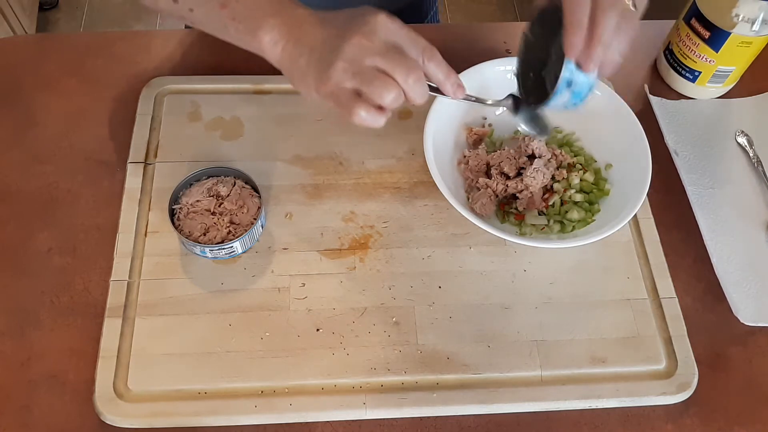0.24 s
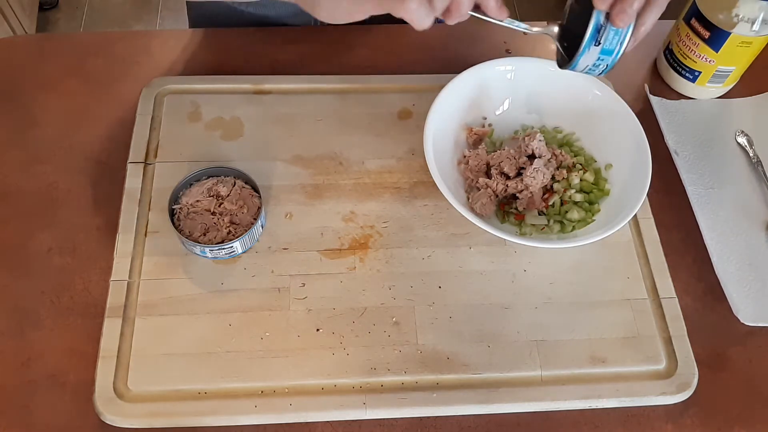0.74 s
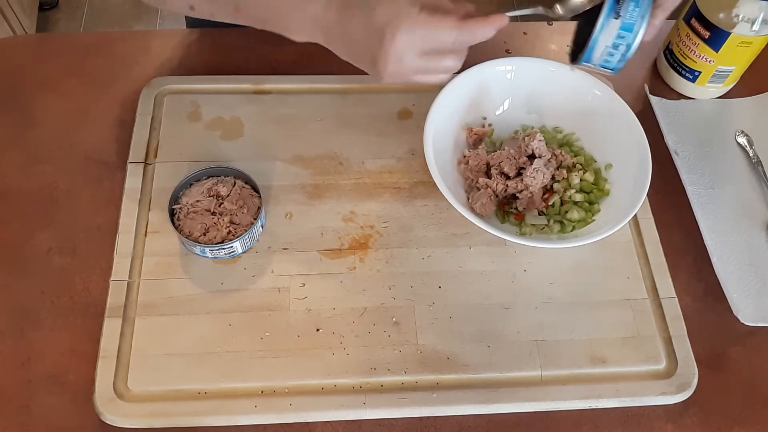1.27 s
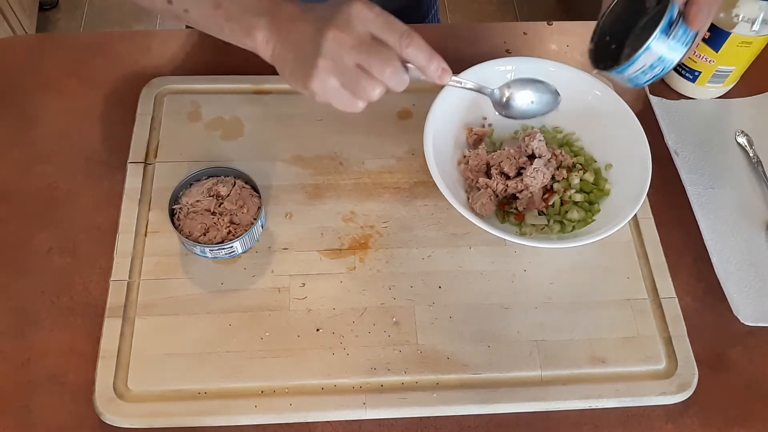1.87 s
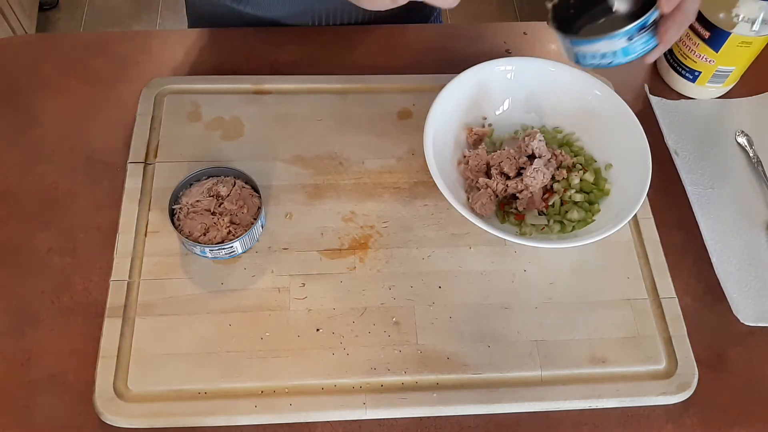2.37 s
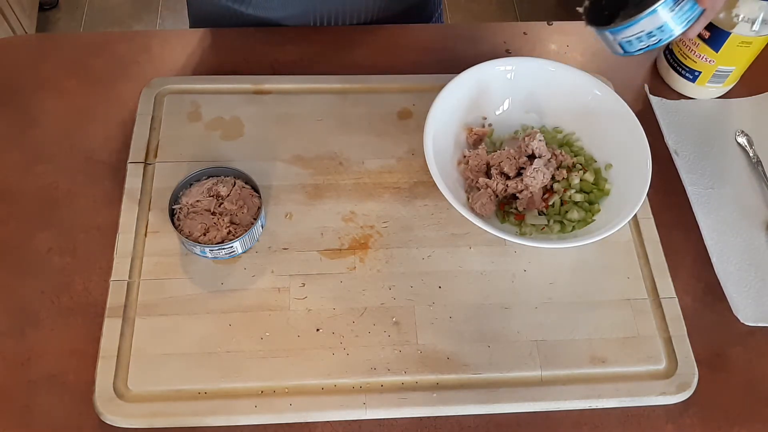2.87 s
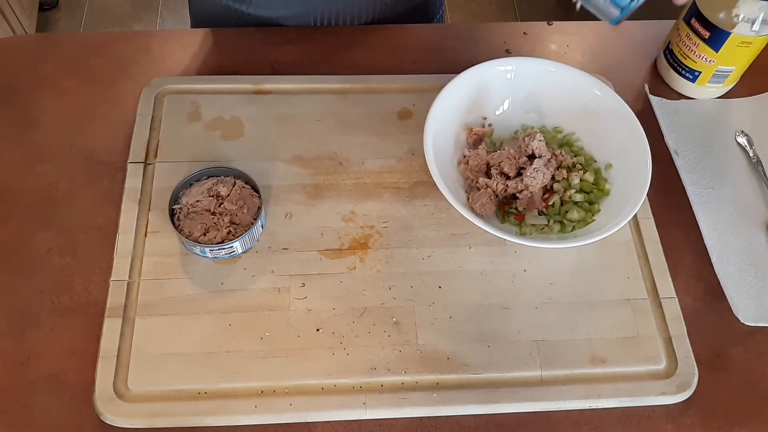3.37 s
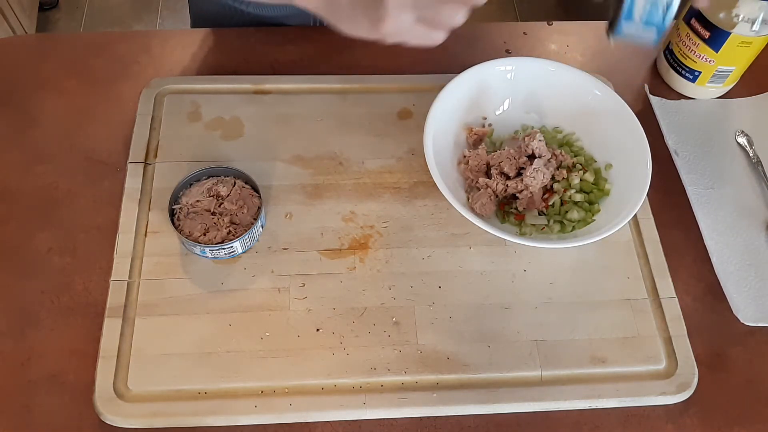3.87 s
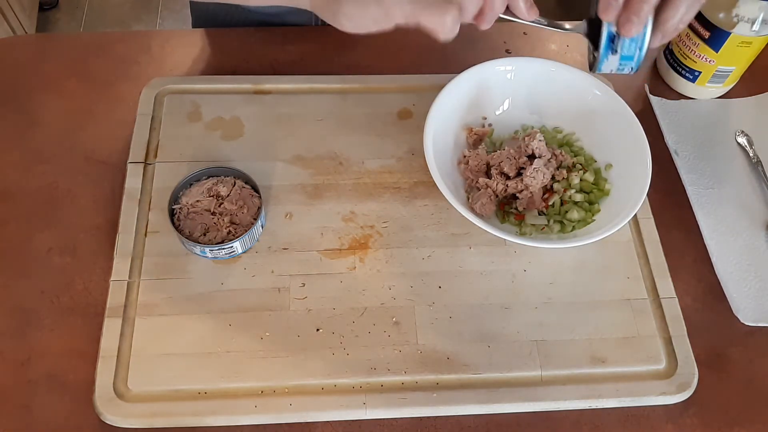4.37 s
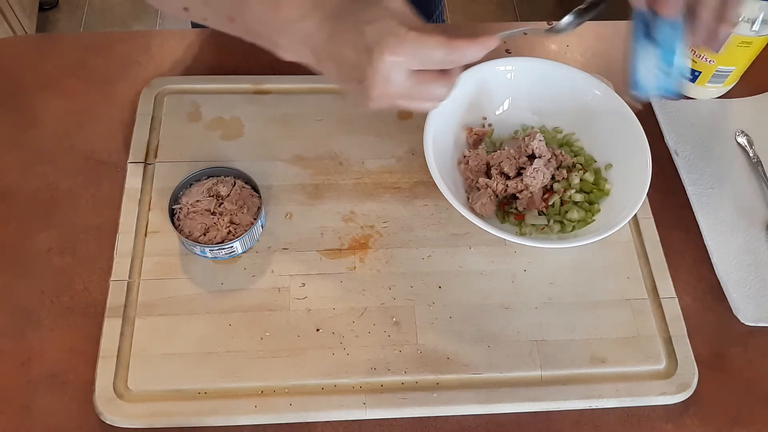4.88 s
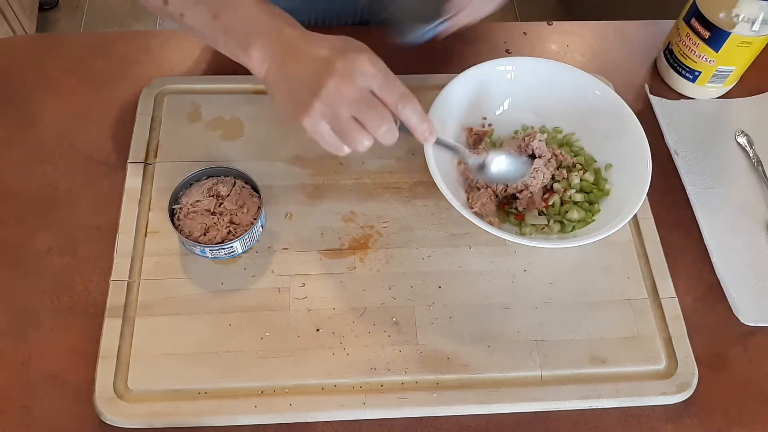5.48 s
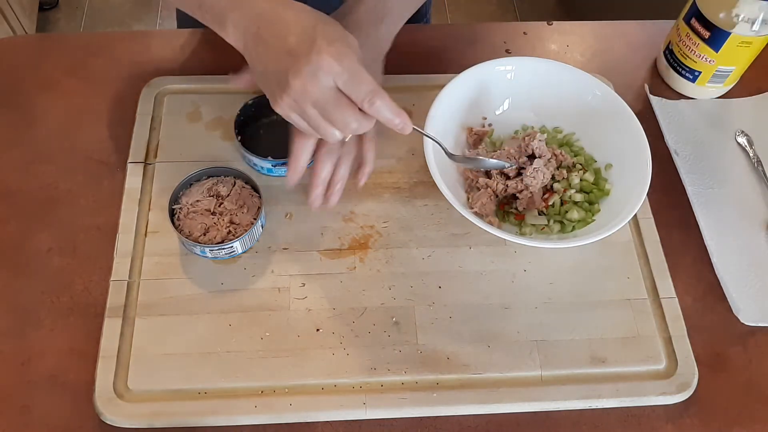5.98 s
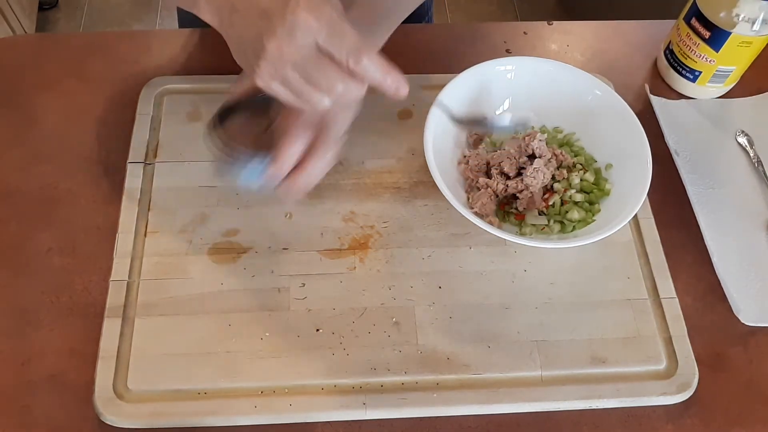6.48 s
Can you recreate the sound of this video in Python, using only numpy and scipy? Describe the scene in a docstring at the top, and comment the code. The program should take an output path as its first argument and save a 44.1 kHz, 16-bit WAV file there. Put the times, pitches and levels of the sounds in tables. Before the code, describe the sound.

A metal spoon scrapes out a thin steel can in short runs, with bright ticks on the rim, brief rasps along the wall and small ringing knocks, separated by pauses. Near the end the empty can is put down on a wooden board with a quick, hollow clatter, followed by a very soft thud. The sounds are close, in a small, slightly reverberant kitchen where an appliance hums faintly.

```python
"""A metal spoon scrapes the last tuna out of a thin steel can held over a bowl in a small kitchen.
Stick-slip friction makes the wall rasp; knocks on the can and ticks on its rim excite damped modes.
The empty can is then put down on a wooden board and knocked against a second can. Moist food and
fingers add soft thuds, the room reverberates, and an appliance hums in the background."""
import sys
import numpy as np
from scipy import signal
from scipy.fft import rfft, irfft, next_fast_len
from scipy.io import wavfile

SR = 44100
rng = np.random.default_rng(int(sys.argv[2]) if len(sys.argv) > 2 else 0)


def store_wav(level_fs):
    """Save 16-bit WAV to argv[1]."""
    pcm = np.round(np.clip(np.atleast_2d(level_fs), -1, 1) * 32767)
    wavfile.write(sys.argv[1], SR, pcm.T.astype(np.int16))


N = 296793
SPAN = 32768   # samples in one event
AGE = np.arange(SPAN) / SR   # seconds since its onset
HZ = np.fft.rfftfreq(SPAN, 1 / SR) + 1


def from_db(db):
    """Amplitude ratio of a level in decibels."""
    return 10 ** (np.asarray(db) / 20)


def unit(x):
    """Normalisation to unit energy."""
    return x / np.sqrt(np.sum(x ** 2) + 1e-20)


def at_hz(points, hz):
    """Interpolation on a log-frequency axis."""
    frequencies, values = np.transpose(points)
    return np.interp(np.log(hz), np.log(frequencies), values)


def fade(t60):
    """Exponential decay, 60 dB in t60 seconds."""
    return from_db(-60 * AGE / max(t60, 1e-3))


def band(x, low, high):
    """Causal Butterworth band-pass."""
    return signal.sosfilt(signal.butter(3, [low, min(high, .45 * SR)], "band", fs=SR, output="sos"), x)


def add(out, start_s, sound):
    """Superposition: mix in an event, its end faded; one begun before time zero leaves only its tail."""
    start = round(start_s * SR)
    ending = np.clip(4 - 5 * AGE / AGE[-1], 0, 1)
    out[:, max(start, 0):start + SPAN] += (sound * ending)[..., max(-start, 0):N - start]


# Motor tones: pitch_hz, level_db
MOTOR_TONES = [(59.3, -82.5), (109.5, -73), (114.5, -87.5), (172, -83), (232, -89), (258, -79), (367, -89),
               (441, -87)]
# Spectrum of the room air: frequency_hz, relative_density_db
AIR_SPECTRUM = [(15, -35), (25, -28), (38, -20), (50, -9.5), (80, -16), (102, -6.5), (206, -17),
                (256, -1.5), (285, -15), (405, -19), (439, -14.5), (560, -20.5), (734, -24.5),
                (1230, -31.5), (7310, -35.5), (16000, -33)]
def appliance_and_air(waver=.25, air_db=-69):
    """Random amplitude and phase modulation makes motor tones waver over faint broadband noise."""
    t = np.arange(N) / SR
    knots = np.arange(0, t[-1] + 1, 1 / 10)
    hum = 0
    for hz, db in MOTOR_TONES:
        swell, drift = (np.interp(t, knots, rng.standard_normal(len(knots))) for _ in range(2))
        phase = 2 * np.pi * hz * t + 2 * waver * drift
        hum += np.sqrt(2) * from_db(db) * (1 + waver * swell) * np.sin(phase)
    size = next_fast_len(N)
    hz = np.fft.rfftfreq(size, 1 / SR) + 1
    mid, side = rfft(rng.standard_normal((2, size))) * from_db(at_hz(AIR_SPECTRUM, hz))
    width = at_hz([(300, 0.44), (2000, 0.97)], hz)   # the ears are more alike in the bass
    air = irfft(np.array([mid + width * side, mid - width * side]), size)[:, :N]
    return (hum + from_db(air_db) * unit(air) * np.sqrt(2 * N)) * from_db([[1.1], [-1.1]])


# Reverberation time of the kitchen: frequency_hz, t60_s
ROOM_DECAY = [(200, 0.59), (600, 0.33), (1500, 0.41), (4000, 0.35), (8000, 0.37), (15000, 0.32)]
def kitchen(gap_s=0.0013, early_db=1, early_t60=0.085):
    """Reverberation, as a frequency response: early reflections off board and bowl, then a diffuse tail."""
    edges = np.geomspace(100, 19000, 8)
    tail = 0
    for low, high in zip(edges, edges[1:]):
        mid, side = rng.standard_normal((2, SPAN))
        apart = min(high / 1800, 1)   # long waves reach both ears alike
        ears = np.array([mid + apart * side, mid - apart * side]) / np.hypot(1, apart)
        tail += band(ears, low, high) * fade(at_hz(ROOM_DECAY, np.sqrt(low * high)))
    tail = unit(tail * np.clip(AGE / gap_s - .5, 0, 1)) * np.sqrt(2)
    return rfft(tail * (1 + from_db(early_db) * fade(early_t60)))


# Touches of moist food and fingers: start_s, length_s, level_db, centre_hz
SOFT_TOUCHES = [(5.149, 0.0049, -71, 5980), (5.217, 0.095, -77, 905), (5.274, 0.0054, -70, 7120),
                (6.235, 0.044, -68, 296), (6.244, 0.029, -74, 1092)]
def thuds():
    """Heavy damping: soft contacts give puffs of band-limited noise with no ring."""
    out = np.zeros((2, N))
    for start_s, length_s, level_db, hz in SOFT_TOUCHES:
        swell = 2 * AGE / length_s * np.exp(1 - 2 * AGE / length_s)
        puff = unit(band(rng.standard_normal(SPAN), hz * .65, hz * 1.42)) * np.sqrt(SPAN) * swell
        add(out, start_s, from_db(level_db) * irfft(rfft(puff) * (1 + .5 * kitchen())))
    return out


def resonance(hz, width_hz):
    """Frequency response of a damped oscillator, with a peak of one."""
    return 1 / (1 + 1j * (HZ ** 2 - hz ** 2) / (HZ * max(width_hz, 4)))


def body(modes, clank_db, clank_t60, crowded_hz, spread_db, damping):
    """Modal superposition: distinct low modes ring while crowded upper modes merge into a short clank."""
    ring = 0
    for k, (hz, width_hz, db) in enumerate(modes):
        strength, detune = rng.standard_normal(2)
        mode = resonance(hz * (1 + 0.0018 * detune), width_hz * damping)
        ring += (-1) ** k * from_db(db + spread_db * strength) * mode
    high_pass = (1j * HZ / (crowded_hz + 1j * HZ)) ** 2
    clank = rfft(unit(rng.standard_normal(SPAN) * fade(clank_t60)))
    return rfft(unit(irfft(ring))) + from_db(clank_db) * high_pass * clank


def spot(hz, width_hz, level_db):
    """Local resonance of the metal at the point of contact, delayed by a quarter period."""
    delay = np.exp(-2j * np.pi * HZ / (4 * hz))
    return from_db(level_db) * rfft(unit(irfft(resonance(hz, width_hz)))) * delay


def blow(chatter_s, chatter_db):
    """Force spectrum of an impact: one impulse, then decaying chatter between the surfaces."""
    chatter = rng.standard_normal(SPAN) ** 3 * np.exp(-AGE / chatter_s)
    force = from_db(chatter_db) * unit(chatter)
    force[0] += 1
    return rfft(force)


def minimum_phase(db):
    """Causality: folding the cepstrum gives a filter with this dB curve and no pre-echo."""
    cepstrum = irfft(np.log(from_db(db)))
    cepstrum[1:SPAN // 2] *= 2
    cepstrum[SPAN // 2 + 1:] = 0
    return np.exp(rfft(cepstrum))


# Bounds of a contact's five registers: edge_hz
REGISTER_EDGES = [250, 1000, 2200, 4400, 8000, 16000]
def voicing(level_db, tilt_db, spots_hz, lift_db, colour=None, reach_octaves=0.74):
    """Spectral envelope in dB per register: hard contacts tilt it up, and spots lift nearby pitches."""
    edges = np.array(REGISTER_EDGES)
    centres = np.sqrt(edges[:-1] * edges[1:])
    octaves = np.log2(edges[1:] / 4000)
    near = sum(np.exp(-(np.log2(centres / hz) / reach_octaves) ** 2) for hz in spots_hz)
    colour_db = 0 if colour is None else at_hz(colour, centres)
    return level_db + tilt_db * octaves + lift_db * near + colour_db


def radiate(spectrum, register_db, side, lag, room_db, pan_db, opening_s=.025):
    """Radiation by direct and reflected paths, equalised toward register_db over the sound's opening."""
    left_lag_s = at_hz(lag, HZ)
    direct = np.exp(-2j * np.pi * HZ * np.maximum([left_lag_s, -left_lag_s], 0))
    lean_db = (at_hz(side, HZ) + pan_db) / 2
    small_radiator = (1j * HZ / (310 + 1j * HZ)) ** 2   # a can gives off little bass
    paths = direct + from_db(room_db) * kitchen()
    ears = spectrum * small_radiator * paths * from_db([lean_db, -lean_db])
    opening = irfft(ears)[:, :int(opening_s * SR)]
    curve = []
    for low, high, db in zip(REGISTER_EDGES, REGISTER_EDGES[1:], register_db):
        gain_db = db - 10 * np.log10(np.mean(band(opening, low, high) ** 2) + 1e-20)
        curve += [(low * 1.15, gain_db), (high / 1.15, gain_db)]
    return irfft(ears * minimum_phase(at_hz(curve, HZ)))


# Level difference between the ears, from the board: frequency_hz, left_minus_right_db
BOARD_BALANCE = [(300, -1.5), (900, 1), (1400, 1), (2600, 0), (3300, -1.5), (6400, -4), (12000, -10.5)]
# Time difference between the ears, from the board: frequency_hz, left_lag_s
BOARD_DELAY = [(300, -.00009), (14000, -.00009)]
# Modes of cans standing on the board: pitch_hz, nominal_width_hz, relative_db
STANDING_MODES = [(240, 89, -8), (398, 14, -10.5), (569, 80, -10.5), (708.6, 16, 1), (803, 20, -2),
                  (918, 14, -2), (1070, 30, -2.5), (1423, 60, -16.5), (1544, 50, -6), (1650, 20, -2),
                  (1713, 13, 0), (1814, 14, 0), (1887, 52, -3), (2486, 80, -2.5), (3253, 45, -8.5),
                  (4028, 85, -2.5), (4955, 62, 0), (6760, 120, -1.5)]
# Timbre of the blunt impacts: frequency_hz, gain_db
BOARD_TIMBRE = [(500, 6.5), (1500, 10), (3100, 2.5), (5900, -2), (11300, -14)]
# Can meets board and can: start_s, nominal_db, tilt_db_per_octave, chatter_s, spot_hz, second_spot_hz
BOARD_IMPACTS = [(5.743, -41, -1.4, 0.018, 717, 4000), (5.804, -54, -2.5, 0.0029, 738, 1535),
                 (5.8572, -33, 0.48, 0.0018, 795, 2477), (5.901, -46.5, 0.88, 0.0054, 1746, 1063)]
def set_down():
    """Blunt impacts act as a low-pass: the empty can clonks on wood and clacks against its neighbour."""
    out = np.zeros((2, N))
    blunt = 1 / (1 + 1j * HZ / 5000) ** 3
    for start_s, level_db, tilt_db, chatter_s, hz, second_hz in BOARD_IMPACTS:
        ring = body(STANDING_MODES, clank_db=5.5, clank_t60=.032, crowded_hz=350,
                    spread_db=1.5, damping=1.4)
        ring += spot(hz, width_hz=25, level_db=0.5) + spot(second_hz, width_hz=40, level_db=-10.5)
        ring *= blunt * blow(chatter_s, chatter_db=-2.5)
        register_db = voicing(level_db, tilt_db, (hz, second_hz), lift_db=4.5, colour=BOARD_TIMBRE)
        add(out, start_s, radiate(ring, register_db, BOARD_BALANCE, BOARD_DELAY, room_db=-3.5, pan_db=.8))
    return out


# Level difference between the ears, from the hands: frequency_hz, left_minus_right_db
HAND_BALANCE = [(300, 5.5), (700, -1), (1000, 0.5), (2000, 1), (3300, -1), (5000, -6.5), (6400, -7),
                (8300, -10), (14000, -9.5)]
# Time difference between the ears, from the hands: frequency_hz, left_lag_s
HAND_DELAY = [(1900, 0.000046), (2400, .00006), (3600, .00015), (14000, 0.00014)]
# Modes of rim and spoon edge: pitch_hz, nominal_width_hz, relative_db
RIM_MODES = [(700, 22, -7.5), (1100, 52, -10), (1879, 33, 6), (2450, 110, -10), (3500, 1200, -14),
             (4560, 68, 2), (4950, 660, -7.5), (5400, 290, -13), (8540, 600, -4), (13500, 1100, -9.5)]
# Timbre of the ticks: frequency_hz, gain_db
TICK_TIMBRE = [(500, -12), (1500, -7.5), (3100, 0.5), (5900, 6), (11300, 6.5)]
# Spoon catches the rim: start_s, nominal_db, tilt_db_per_octave, chatter_s, spot_hz, low_spot_hz
RIM_TICKS = [(-0.11, -37, -0.5, 0.002, 5070, 1906), (0.2208, -35.5, 0.34, 0.0058, 5300, 1122),
             (2.736, -43.5, -0.9, 0.0026, 3590, 1110), (3.0443, -45.5, -3.5, 0.0015, 3530, 1960),
             (4.085, -38.5, -0.5, 0.0018, 4360, 704), (4.828, -53, -0.3, 0.0058, 4490, 2424)]
def ticks():
    """Impulse excitation of a stiff edge: the spoon snaps over the rim, short and bright."""
    out = np.zeros((2, N))
    for start_s, level_db, tilt_db, chatter_s, hz, low_hz in RIM_TICKS:
        ring = body(RIM_MODES, clank_db=-6, clank_t60=.025, crowded_hz=2500, spread_db=3.5, damping=1.5)
        ring += spot(hz, width_hz=400, level_db=-0.5) + spot(low_hz, width_hz=33, level_db=-9)
        ring *= blow(chatter_s, chatter_db=0)
        register_db = voicing(level_db, tilt_db, (hz,), lift_db=6.5, colour=TICK_TIMBRE)
        add(out, start_s, radiate(ring, register_db, HAND_BALANCE, HAND_DELAY, room_db=.5, pan_db=.74))
    return out


# Modes of the hand-held can: pitch_hz, nominal_width_hz, relative_db
CAN_MODES = [(235, 110, -17.5), (385, 14, -7.5), (528, 100, -14.5), (699.1, 16, 5.5), (1130.6, 29, -7.5),
             (1310, 33, -10), (1610, 61, -13), (1858.5, 24, 1.5), (1921, 31, 0), (2490, 35, 2.5),
             (2636, 15, -4.5), (2830, 13, -5.5), (3270, 43, -0.5), (3978, 100, 1.5), (4890, 85, -1.5),
             (5154, 55, -6.5), (5680, 67, -6), (6540, 63, -3.5), (6690, 40, -5), (7770, 140, -9.5),
             (8440, 370, -9), (9340, 920, -7.5), (10620, 210, -9), (11140, 250, -6), (13000, 180, -16)]
# Spoon hits the can:
# start_s, nominal_db, tilt_db_per_octave, chatter_s, spot_hz, second_spot_hz, lift_db, base_drive_db
SPOON_KNOCKS = [(0.5434, -56, -6, 0.0075, 823, 1850, 11, -18),
                (0.614, -35, 0.6, 0.0021, 4023, 2493, 6.1, -9.5),
                (2.3154, -30, 0.95, 0.0021, 6800, 1864, 0.66, 6),
                (3.0828, -29.5, -0.8, 0.0013, 2633, 1950, 5, 4.5),
                (3.093, -38.5, 0.04, 0.0026, 705, 1940, 5, 3),
                (3.3273, -39.5, 0.2, 0.0041, 6414, 2428, 12.3, 2),
                (3.348, -40.5, -1.5, 0.0017, 4920, 707, 1.9, -3.5),
                (3.7511, -58, -1.5, 0.0012, 1893, 2520, 9.4, 2),
                (3.775, -41, -2.1, 0.0036, 6390, 2505, 14.7, 4.5),
                (3.788, -34, 1, 0.00043, 3964, 1088, 2, -7.5),
                (4.17, -39, 0.6, 0.0011, 5050, 1840, 6.7, 1.5),
                (4.214, -38, -.2, 0.0017, 5080, 713, 3.3, -3.5)]
def knocks(base_hz=685, base_width_hz=33):
    """Free vibration after impact: the can rings between the fingers, its base like a small drumhead."""
    out = np.zeros((2, N))
    for start_s, level_db, tilt_db, chatter_s, hz, second_hz, lift_db, base_db in SPOON_KNOCKS:
        ring = body(CAN_MODES, clank_db=1, clank_t60=.022, crowded_hz=2980, spread_db=2, damping=1.1)
        ring += spot(hz, width_hz=0.017 * hz, level_db=-6)
        ring += spot(second_hz, width_hz=0.032 * second_hz, level_db=-10.5)
        ring *= 1 + (from_db(base_db) - 1) * resonance(base_hz, base_width_hz)
        ring *= blow(chatter_s, chatter_db=-3)
        register_db = voicing(level_db, tilt_db, (hz, second_hz), lift_db)
        add(out, start_s, radiate(ring, register_db, HAND_BALANCE, HAND_DELAY, room_db=-4.5, pan_db=1))
    return out


# Timbre of the scraping: frequency_hz, gain_db
SCRAPE_TIMBRE = [(500, -8.5), (1500, -1), (3100, 3), (5900, 3), (11300, 1)]
# Spoon slides along the wall: start_s, rise_s, fall_s, nominal_db, tilt_db_per_octave, spot_hz
SPOON_STROKES = [(0.574, 0.016, 0.023, -52.5, -2.5, 2800), (0.898, 0.092, 0.096, -82.5, -5, 3970),
                 (1.069, 0.058, 0.04, -71.5, -1.9, 3780), (1.188, 0.048, 0.022, -70.5, 3.5, 7800),
                 (1.234, 0.022, 0.016, -55.5, 4.4, 3080), (2.355, 0.071, 0.054, -46.5, -2, 2600),
                 (2.467, 0.033, 0.0097, -56, 0.3, 1870), (2.765, 0.02, 0.064, -58.5, -1.8, 4170),
                 (2.824, 0.016, 0.05, -53, 1.8, 3930), (3.051, 0.028, 0.0063, -47, 2, 8550),
                 (3.124, 0.014, 0.043, -54, -5.5, 4900), (3.582, 0.039, 0.025, -74.5, 2, 3900),
                 (4.093, 0.053, 0.0071, -46, 1.1, 4400), (4.181, 0.0052, 0.021, -41, -3, 1900),
                 (4.231, 0.0054, 0.04, -60.5, -6, 4100), (4.475, 0.028, 0.016, -59, 0.4, 1830),
                 (4.552, 0.079, 0.026, -68.5, 2.2, 4070), (4.67, 0.03, 0.24, -77.5, 0.7, 4180),
                 (4.79, 0.021, 0.025, -58, 2, 4340)]
def scrapes(slips_per_s=1700, uneven_db=3):
    """Stick-slip friction: uneven slips swell with pressure and drive the wall, damped by the spoon."""
    out = np.zeros((2, N))
    for start_s, rise_s, fall_s, level_db, tilt_db, hz in SPOON_STROKES:
        length_s = rise_s + fall_s
        pressure = np.interp(AGE, [0, rise_s, length_s], [.1, 1, .15]) * (AGE < length_s)
        slips = rng.random(SPAN) < slips_per_s / SR
        strength = from_db(uneven_db * np.clip(rng.standard_normal(SPAN), -2, 2))
        force = pressure * (slips * strength + 0.044) * rng.standard_normal(SPAN)
        wall = body(CAN_MODES, clank_db=7.5, clank_t60=.012, crowded_hz=2100, spread_db=0, damping=1.8)
        wall += spot(hz, width_hz=0.053 * hz, level_db=-1.5)
        register_db = voicing(level_db, tilt_db, (hz,), lift_db=1.5, colour=SCRAPE_TIMBRE)
        rasp = radiate(rfft(force) * wall, register_db, HAND_BALANCE, HAND_DELAY,
                       room_db=-3, pan_db=2, opening_s=length_s)
        add(out, start_s, rasp)
    return out


def scene():
    """Linear superposition of the handling sounds and the kitchen's hum."""
    return knocks() + ticks() + scrapes() + set_down() + thuds() + appliance_and_air()


def record(dry):
    """Band limiting: an elliptic low-pass cuts steeply above 16 kHz."""
    return signal.sosfilt(signal.ellip(10, .2, 80, 16000, fs=SR, output="sos"), dry)


dry = scene()
out = record(dry)
store_wav(out)
```